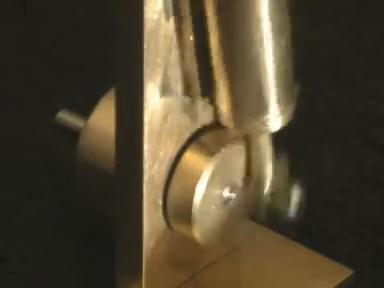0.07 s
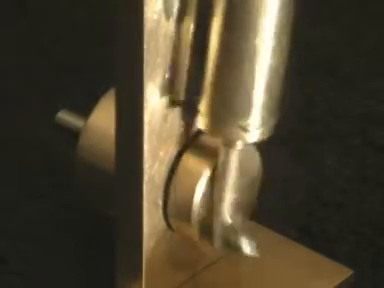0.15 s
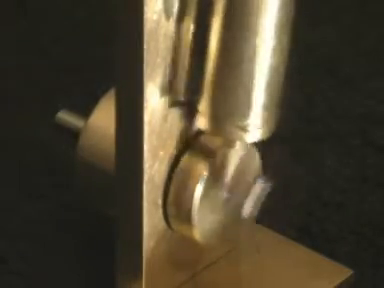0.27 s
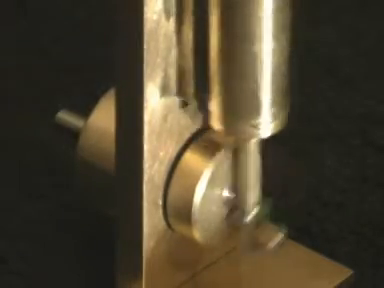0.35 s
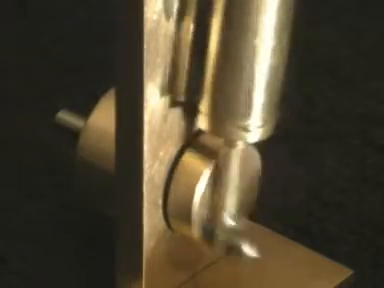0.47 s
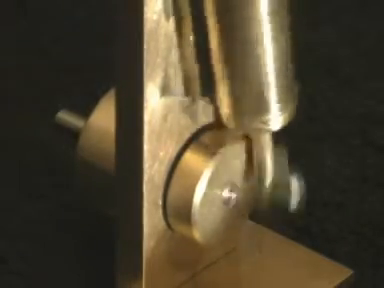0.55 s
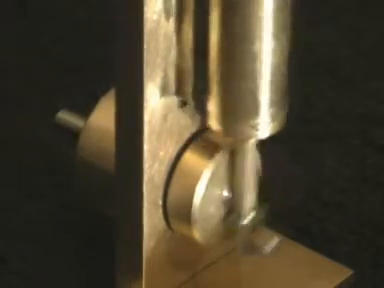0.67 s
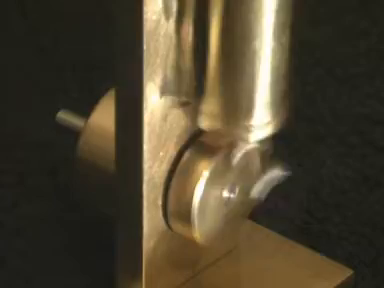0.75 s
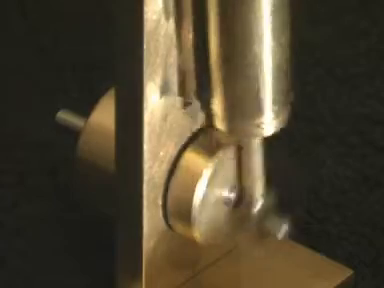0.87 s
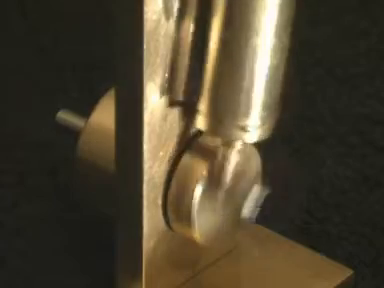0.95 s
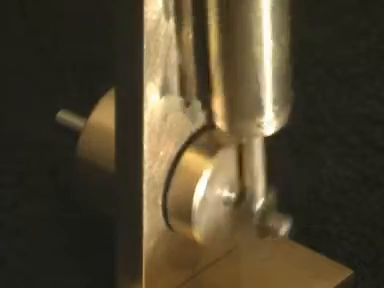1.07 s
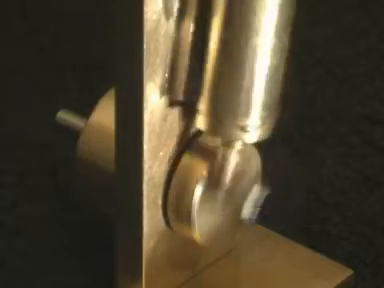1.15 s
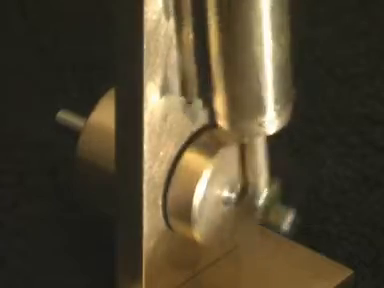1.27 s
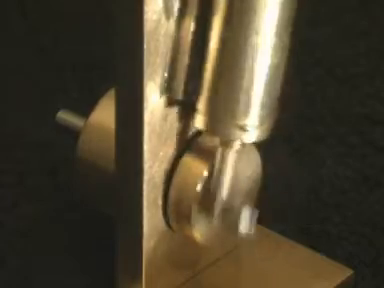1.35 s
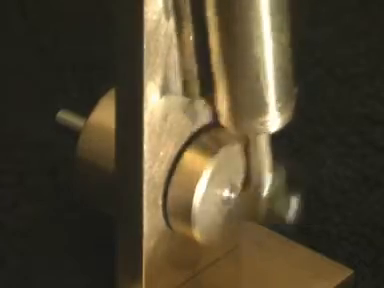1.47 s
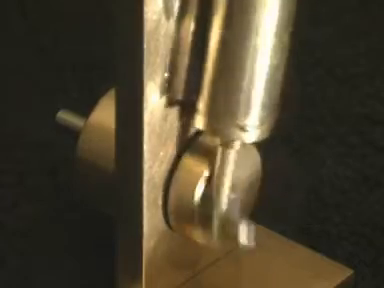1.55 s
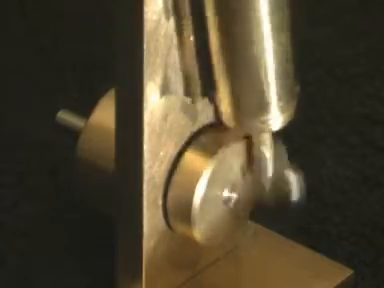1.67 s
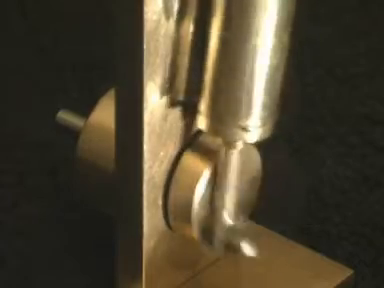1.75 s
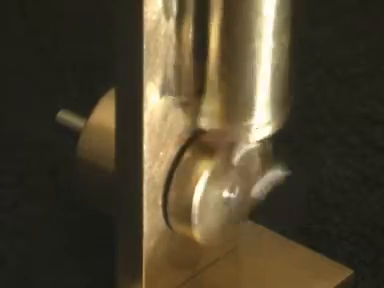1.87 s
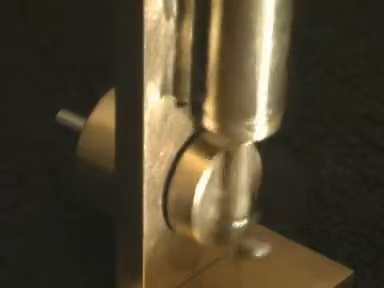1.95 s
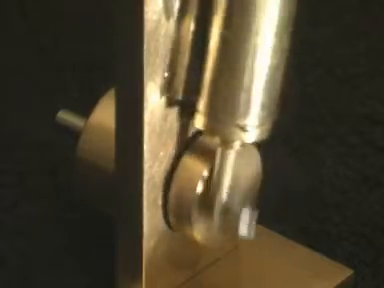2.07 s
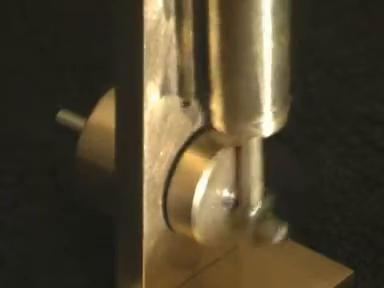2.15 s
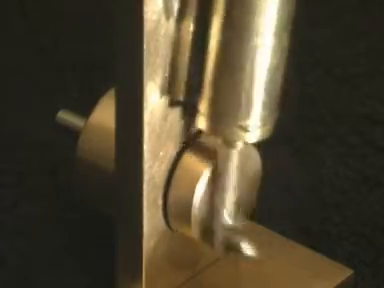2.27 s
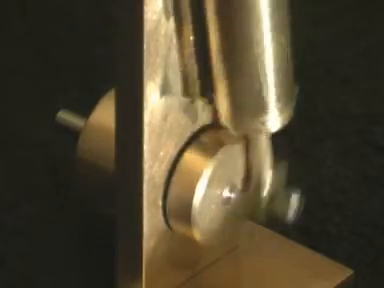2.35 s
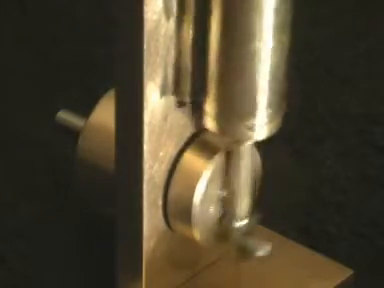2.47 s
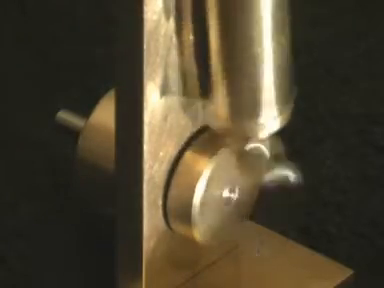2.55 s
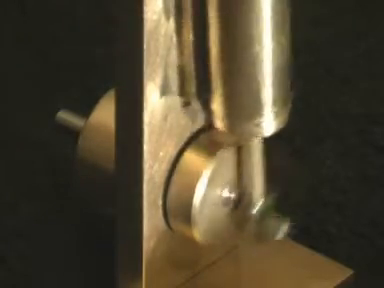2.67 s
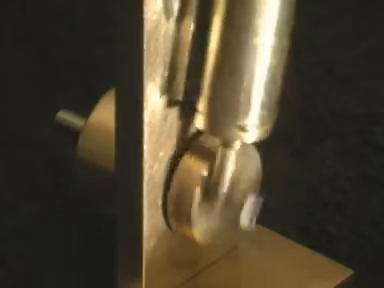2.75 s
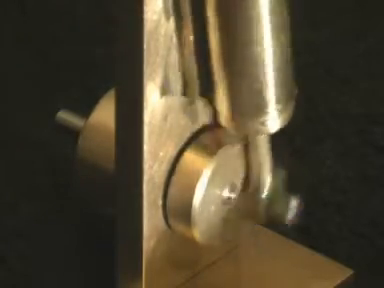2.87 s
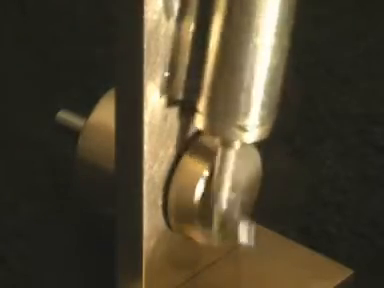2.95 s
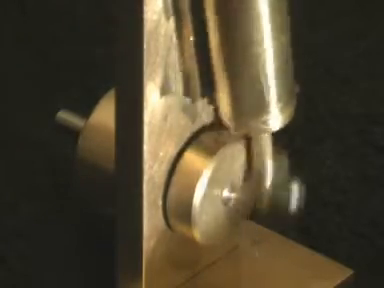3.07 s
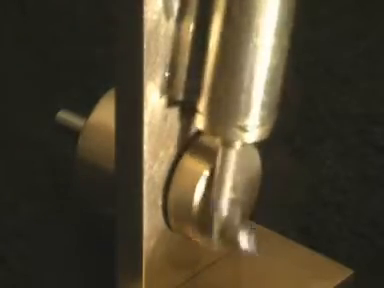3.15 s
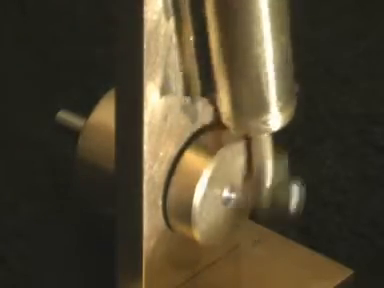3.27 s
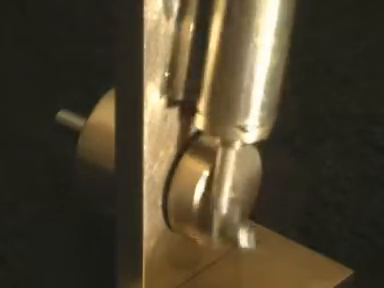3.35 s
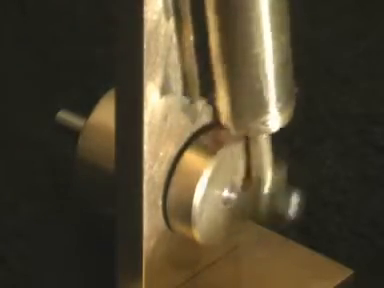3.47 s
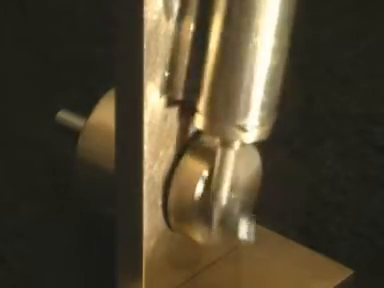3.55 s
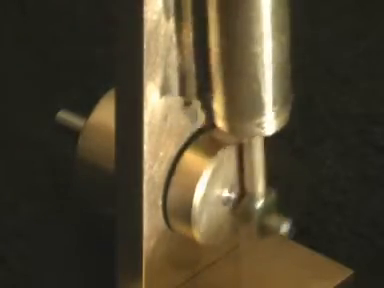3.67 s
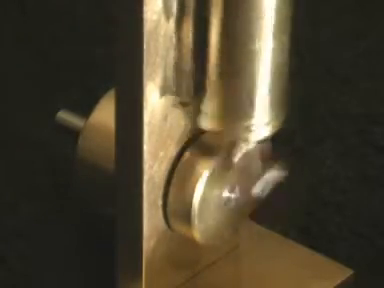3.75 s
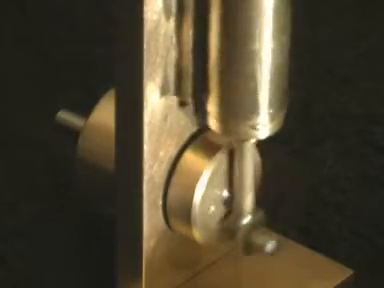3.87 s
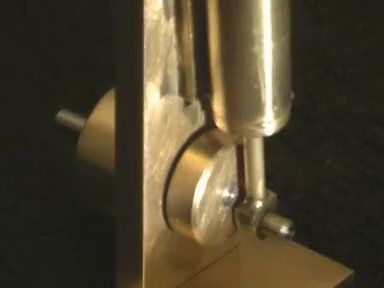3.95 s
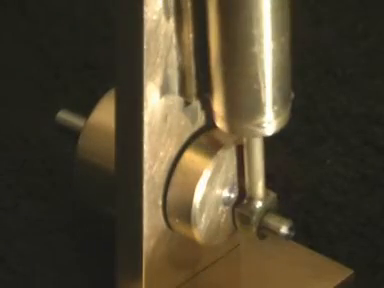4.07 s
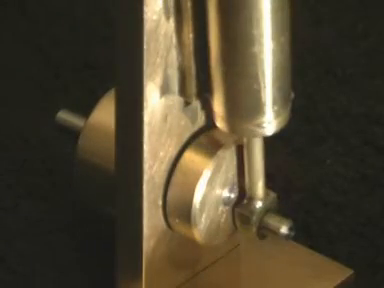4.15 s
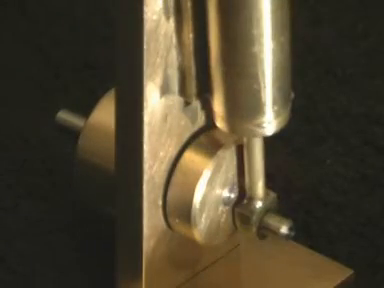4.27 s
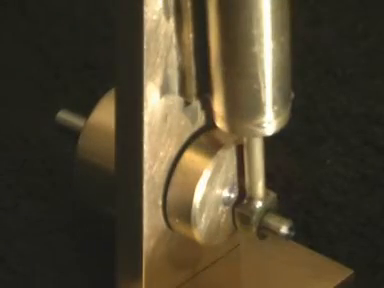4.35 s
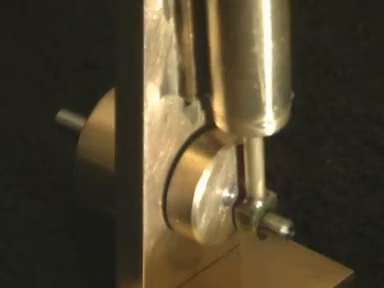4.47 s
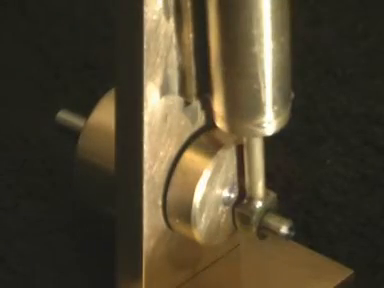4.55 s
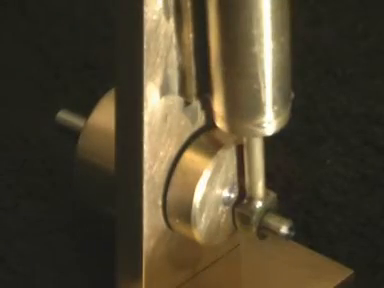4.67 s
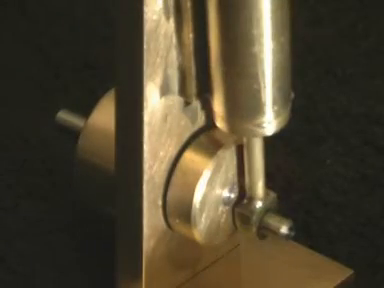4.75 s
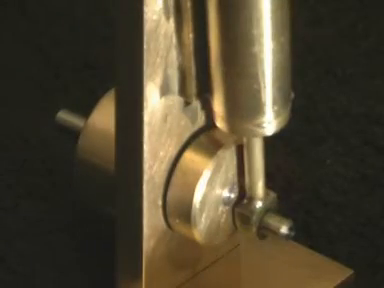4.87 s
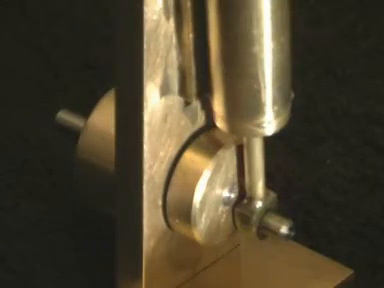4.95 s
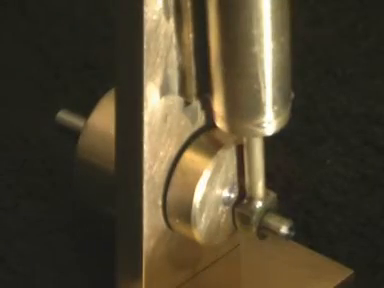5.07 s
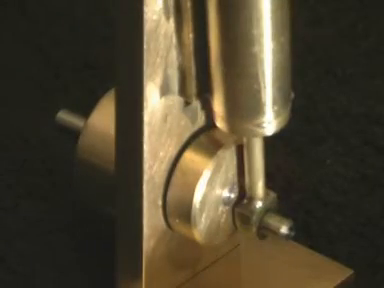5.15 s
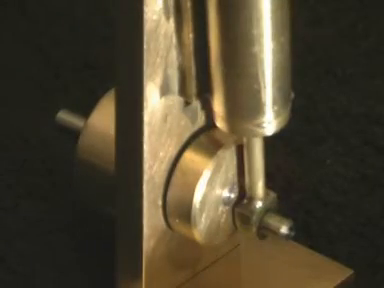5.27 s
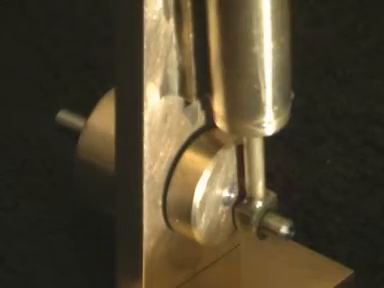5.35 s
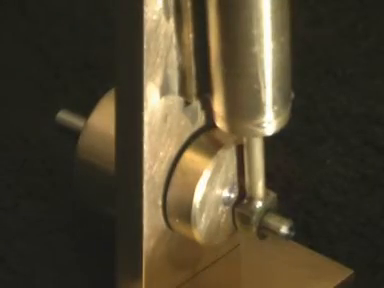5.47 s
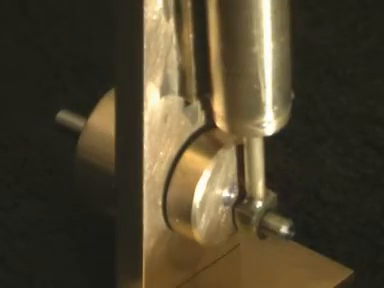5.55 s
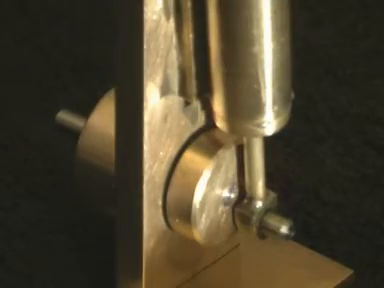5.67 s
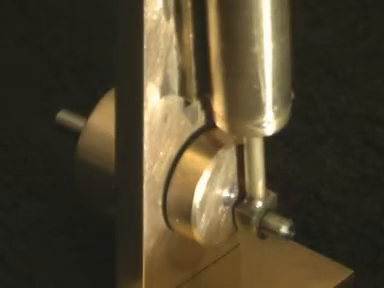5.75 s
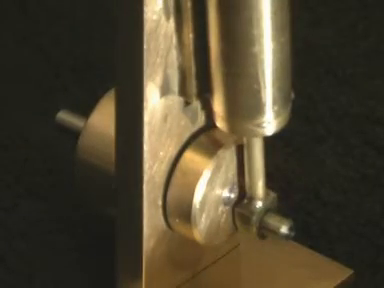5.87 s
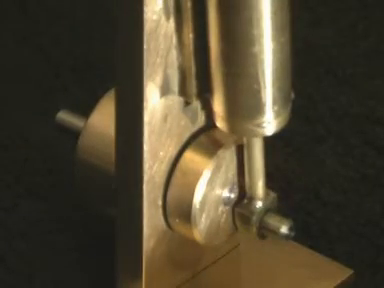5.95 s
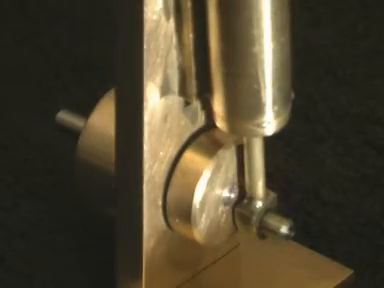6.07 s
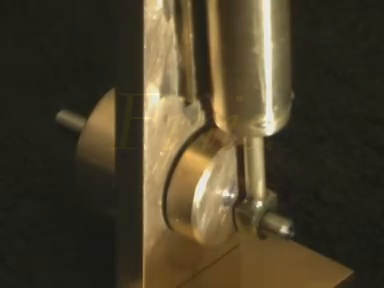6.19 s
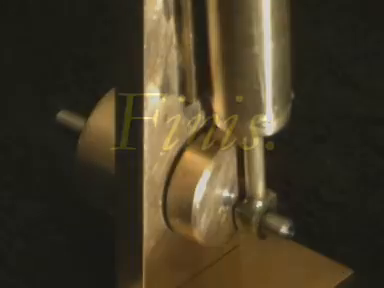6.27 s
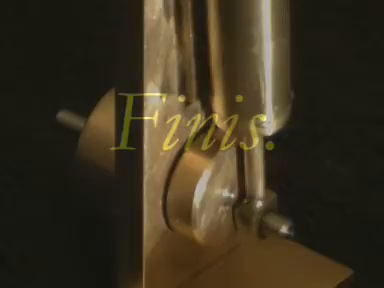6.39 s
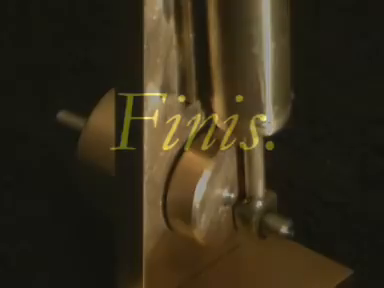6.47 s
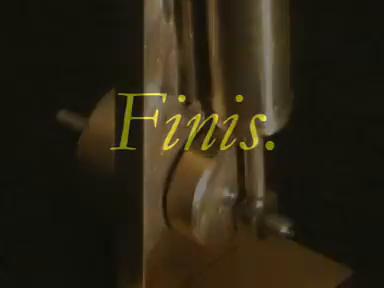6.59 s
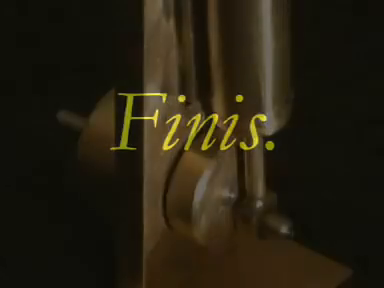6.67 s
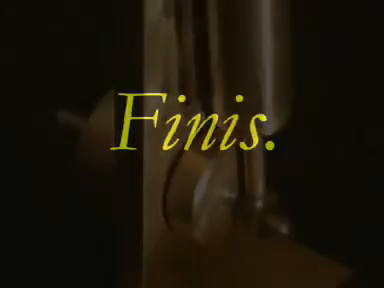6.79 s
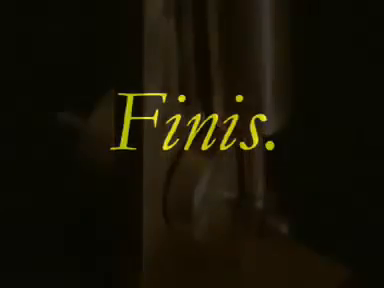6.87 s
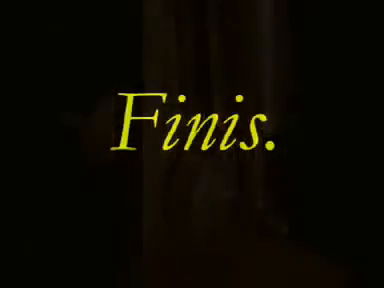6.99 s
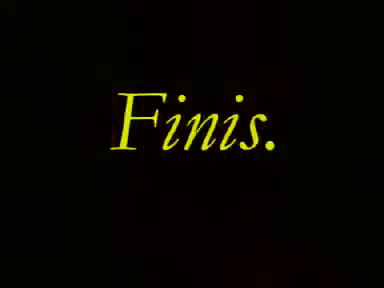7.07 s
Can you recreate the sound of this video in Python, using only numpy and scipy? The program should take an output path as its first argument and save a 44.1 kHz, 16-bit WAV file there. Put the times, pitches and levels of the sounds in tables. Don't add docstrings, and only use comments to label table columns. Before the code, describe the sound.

A small compressed-air engine spits rapid crisp exhaust puffs, slows gradually and stalls near four seconds, leaving a steady airy leak that fades out.

```python
import sys
import numpy as np
from scipy import signal
from scipy.fft import rfft, irfft
from scipy.io import wavfile
from scipy.ndimage import uniform_filter1d

SR = 44100
rng = np.random.default_rng(int(sys.argv[2]) if len(sys.argv) > 2 else 0)


def volts_from_db(level):
    exponent = np.asarray(level, float) / 20
    return 10 ** exponent


def file_out(sig):
    cols = np.atleast_2d(sig).T
    lim = np.clip(cols, -1, 1)
    pcm = np.round(lim * 32767).astype(np.int16)
    wavfile.write(sys.argv[1], SR, pcm)


N = 313992
T = np.arange(N) / SR
F = np.fft.rfftfreq(N, 1 / SR)

TURN_S = [0.003, 0.16, .315, 0.472, .633, 0.807, .993, 1.192, 1.38, 1.569, 1.75, 1.926, 2.099, 2.271, 2.445,
          2.618, 2.785, 2.969, 3.16, 3.362, 3.568, 3.807]
FIRST_TURN_S, LAST_TURN_S = 0.18, 0.24
STALL_ANGLE = 0.6927
LEAD_S = 0.017
PUFF_ANGLE = 0.35
# time_s, level_db
PRESSURE = [(0, 1.14), (2.5, 0.6), (3.9, -1.5)]
SPIT_FOLLOWS, CYLINDER_FOLLOWS = 0.87, 0.49
SPIT_SCATTER_DB, PUFF_SCATTER_DB, THUMP_SCATTER_DB, THUMP_DB = 1.35, 0.4, 1, 1

PORT_CRACKS, SPIT = (0.9065, 0.01, 840, 76), (0.995, 0.0083, 490, 157)
EXHAUST, BLOWDOWN = (0.22, 0.12, 117, 54), (0.27, 0.13, 360, 88)
PORT_SHUTS = (0.43, 0.1, 83, 330)
FILLING, RETURN = (0.061, 0.73, 200, 44), (0.736, 0.026, 85, 89)
CORE = (.35, 0.046, 113, 100)
# (jet_db, gap_db, cylinder_db, leak_db, edge_db)
FLOW = [
    (PORT_CRACKS, (-31.5, -61, -61, -49, -56)),
    (SPIT, (-26, -33.5, -43, -31, -50)),
    (EXHAUST, (-27.5, -37.5, -55, -37.5, -40)),
    (BLOWDOWN, (-34.5, -42, -37.5, -35.5, -50)),
    (CORE, (-37, -42, -35.5, -39, -56)),
    (PORT_SHUTS, (-31, -45.5, -49, -52, -37)),
    (FILLING, (-63, -46.5, -70, -42, -62)),
    (RETURN, (-62, -65, -53, -36.5, -60)),
]
# jet_db, gap_db, cylinder_db, leak_db, edge_db
SHUT = (-50, -70, -66, -49.5, -66)

# pitch_hz, level_db
JET = [(4500, -42), (5800, -14.5), (6800, -6.5), (7600, -3.5), (9000, -0.5), (10400, -2.5), (11600, -4),
       (13000, -13), (14500, -20.5), (16200, -23)]
# pitch_hz, level_db
GAP = [(600, -3.5), (1500, -15.5), (2400, -10.5), (3200, 0), (4400, 3), (5500, -2), (8000, -3),
       (11000, -6.5), (12600, -4.5), (13400, -2.5), (15000, 0), (16500, -22)]
# pitch_hz, level_db
LEAK = [(410, -53), (700, -8.5), (885, -10), (1340, -6.5), (1470, -14), (1640, -11.5), (2370, -12.5),
        (2850, -8), (3070, -9.5), (4840, -8), (5550, -13.5), (6920, -2), (8640, 0), (10700, -6),
        (13300, -9)]
# pitch_hz, width_hz, level_db
CYLINDER = [(830, 200, -7.5), (1078, 290, 2.5), (1386, 320, -0.5), (1628, 200, 1), (2066, 435, 1.5),
            (2500, 350, -8), (2900, 400, -9)]
# pitch_hz, width_hz, level_db
SEAT = [(1280, 540, 2.9), (1630, 120, 4.9), (2780, 160, 4.5), (3150, 90, 5.5), (7040, 220, 3),
        (8800, 500, 2.5), (13400, 500, -3)]
EDGE_HZ, EDGE_WIDTH_HZ = 12400, 2300
WHINE_HZ, WHINE_DB = 14300, -14
# crank_angle_turns, level_db
THUMPS = [
    (0, -44),
    (.53, -49.5),
    (.3, -53.5),
]
# pitch_hz, level_db, decay_s (to -60 dB)
BASE = [(88, -12, 0.037), (119, 5.5, 0.091)]

# pitch_hz, level_db
MOTOR = [(50, -43), (85, -12.5), (150, -7.5), (204, -6.5), (318, -6), (403, -2), (491, -2.5), (585, -8),
         (655, -10.5), (875, -13.5), (1000, -17), (1300, -38), (2200, -120)]
MOTOR_DB = -54
# pitch_hz, level_db, wobble_db
HUM = [(49.7, -67, 2), (120, -65.5, 2.5), (149.8, -59.5, 0.4), (162, -62.5, 2), (215.2, -68.5, 2),
       (393, -64.5, 0), (423.6, -63.5, -0.3), (492, -65.5, 0), (652, -65, 3.5)]

# start_s, level_db
TAPS = [
    (.119, -39),
    (.131, -40),
    (5.25, -48),
]
# pitch_hz, level_db, decay_s (to -60 dB)
TRAY = [(325, -3, .06), (384, 6, .06), (447, -2.5, .05)]
# start_s, level_db, dullness_0_to_1
KNOCKS = [
    (4.4181, -30.5, 0.44),
    (4.435, -39, 0.76),
    (4.46, -39, 0.7),
]
# pitch_hz, level_db, decay_s (to -60 dB)
BENCH = [(120, -15, 0.1), (220, -5.5, 0.16), (250, -9, 0.11), (283, -5.5, 0.12), (340, -9, 0.1),
         (385, -7, 0.058), (457, -6, 0.055)]

# time_s, level_db
FADE = [(6.0, -2.5), (6.2, -3), (6.4, -7), (6.6, -11.5), (6.8, -17), (7.0, -26.5), (7.12, -36)]
# low_hz, high_hz, treble_level_db
TOP_BANDS = [(14500, 15150, -56.5), (15150, 15730, -33.5)]
# pitch_hz, level_db
BUZZ = [(1378.125, -76), (2756.25, -82), (4134.375, -85), (5512.5, -88), (6890.625, -85)]
OFFSET = -0.0005


def unit(x):
    return x / np.sqrt(np.mean(x ** 2))


def shape(points):
    hz, db = np.transpose(points)
    octave = np.log2(F + 1)
    outside = np.maximum(np.log2(hz[0]) - octave, 0) + np.maximum(octave - np.log2(hz[-1]), 0)
    return volts_from_db(np.interp(octave, np.log2(hz), db) - 11 * outside)


def resonance(hz, width_hz):
    return 1 / np.sqrt(1 + ((F ** 2 - hz ** 2) / (F * width_hz + 1e-9)) ** 2)


def hiss(gain):
    return unit(irfft(rfft(rng.standard_normal(N)) * gain, N))


def flutter(rate_hz):
    return hiss(1 / (1 + (F / rate_hz) ** 2))


def below(x, hz):
    return signal.sosfiltfilt(signal.ellip(12, 0.1, 45, hz, fs=SR, output="sos"), x)


def ring(times, gains, modes, push_s):
    blows = np.zeros(N)
    np.add.at(blows, np.clip((np.asarray(times) * SR).astype(int), 0, N - 1), gains)
    t = T[:SR // 3]
    body = 0
    for hz, db, t60 in modes:
        body = body + volts_from_db(db) * np.sin(2 * np.pi * hz * t) * np.exp(-np.log(1000) * t / t60)
    push = t * np.exp(-t / push_s)
    sound = signal.fftconvolve(blows, body)[:N]
    sound = signal.fftconvolve(sound, push / push.sum())[:N]
    return signal.sosfilt(signal.butter(4, 90, "high", fs=SR, output="sos"), sound)


def shaft():
    top_s = np.array(TURN_S)
    count = np.arange(len(top_s))
    stall_s = top_s[-1] + STALL_ANGLE * LAST_TURN_S
    marks_s = np.r_[top_s[0] - FIRST_TURN_S, np.c_[top_s - LEAD_S, top_s].ravel(), stall_s]
    crack_and_top = count[:, None] + [PORT_CRACKS[0] - 1, 0]
    turns = np.r_[-1, crack_and_top.ravel(), count[-1] + STALL_ANGLE]
    return marks_s, turns


def ports(crank):
    power = volts_from_db(np.array(SHUT))[:, None] ** 2
    for (opens, hold, rise_db, fall_db), flow_db in FLOW:
        since = (crank - opens - hold / 2 + 0.5) % 1 - 0.5
        opening_db = rise_db * np.maximum(-since - hold / 2, 0)
        closing_db = fall_db * np.maximum(since - hold / 2, 0)
        power = power + volts_from_db(2 * (np.array(flow_db)[:, None] - opening_db - closing_db))
    return np.sqrt(power)


def efforts(crank):
    count = np.arange(len(TURN_S))
    pressure_db = np.interp(TURN_S, *np.transpose(PRESSURE))
    chance = rng.standard_normal((3, len(count)))
    spit_db = SPIT_FOLLOWS * pressure_db + SPIT_SCATTER_DB * chance[0]
    puff_db = pressure_db + PUFF_SCATTER_DB * chance[1]
    cylinder_db = CYLINDER_FOLLOWS * pressure_db + PUFF_SCATTER_DB * chance[2]
    spit_then_puff = np.c_[count, count + PUFF_ANGLE].ravel()
    effort_db = np.interp(crank, spit_then_puff, np.c_[spit_db, puff_db].ravel())
    return effort_db, np.interp(crank, count + PUFF_ANGLE, cylinder_db)


def port_air(jet_port, gap_port, edge_port, effort_db, eddies):
    jet = jet_port * volts_from_db(effort_db + 0.32 * flutter(40)) * eddies * hiss(shape(JET))
    gap = gap_port * volts_from_db(effort_db + 0.39 * flutter(40)) * eddies * hiss(shape(GAP))
    rim = hiss(1 / (1 + ((F - EDGE_HZ) / EDGE_WIDTH_HZ) ** 4))
    edge = edge_port * volts_from_db(0.5 * effort_db) * eddies * rim
    return jet + gap + edge


def cylinder_puff(port, effort_db, cylinder_db, eddies):
    hollow = np.sqrt(sum((volts_from_db(db) * resonance(hz, width) ** 2) ** 2 for hz, width, db in CYLINDER))
    cavity = port * volts_from_db(cylinder_db + flutter(60)) * eddies * hiss(hollow)
    dull = irfft(rfft(cavity) * resonance(1060, 1200), N)
    return dull + np.clip(0.3 + 0.3 * effort_db, 0, 1) * (cavity - dull)


def leak_hiss(port, effort_db):
    seat = np.prod([1 + (volts_from_db(db) - 1) * resonance(hz, width) ** 2 for hz, width, db in SEAT], axis=0)
    whine = hiss(1 / (1 + ((F - WHINE_HZ) / 850) ** 6))
    seep = hiss(shape(LEAK) * seat) + volts_from_db(WHINE_DB) * whine
    return port * volts_from_db(0.87 * effort_db + 0.26 * flutter(18)) * seep


def base_thumps(marks_s, turns):
    count = np.arange(len(TURN_S))
    thump_db = THUMP_DB + THUMP_SCATTER_DB * rng.standard_normal(len(count))
    sound = np.zeros(N)
    for angle, db in THUMPS:
        reached = len(count) - (angle > STALL_ANGLE)
        times = np.interp(count + angle, turns, marks_s)
        sound += ring(times[:reached], volts_from_db(db + thump_db)[:reached], BASE, 0.0015)
    return sound


def shaft_rumble(stall_s):
    colour = shape([(75, -6), (110, -6), (250, 1), (350, -7.5), (550, -9.5), (800, -17)])
    return volts_from_db(-58.5 + 2 * flutter(25)) * (T < stall_s) * hiss(colour)


def engine():
    marks_s, turns = shaft()
    stall_s = marks_s[-1]
    crank = np.interp(T, marks_s, turns)
    jet_port, gap_port, cylinder_port, leak_port, edge_port = ports(crank)
    effort_db, cylinder_db = efforts(crank)
    eddies = volts_from_db(1.4 * flutter(300))
    air = port_air(jet_port, gap_port, edge_port, effort_db, eddies)
    air = air + cylinder_puff(cylinder_port, effort_db, cylinder_db, eddies)
    moving = np.clip((stall_s - T) / 0.021, 0.12, 1)
    leak = leak_hiss(leak_port, effort_db)
    return moving * air + leak + base_thumps(marks_s, turns) + shaft_rumble(stall_s)


def camcorder():
    out = volts_from_db(MOTOR_DB + flutter(12)) * np.array([hiss(shape(MOTOR)), hiss(shape(MOTOR))])
    for hz, db, wobble_db in HUM:
        phase = 2 * np.pi * hz * T + 0.29 * wobble_db * flutter(0.65)
        lag = np.array([[0], [rng.uniform(0, min(hz / 180, 1.5))]])
        out = out + np.sqrt(2) * volts_from_db(db + wobble_db * flutter(4.9)) * np.sin(phase + lag)
    return out


def taps():
    start_s, db = np.transpose(TAPS)
    return ring(start_s, volts_from_db(db), TRAY, 0.00023)


def knocks():
    sound = np.zeros(N)
    for start_s, db, dull in KNOCKS:
        sound += ring([start_s], [volts_from_db(db)], BENCH, 0.0001 + 0.00044 * dull)
    return sound


def room(near):
    t = T[:SR // 5]
    tails = rng.standard_normal((2, len(t))) * np.exp(-np.log(1000) * t / 0.071) * (t > 0.001)
    tails = tails / np.sqrt(np.sum(tails ** 2, axis=1, keepdims=True))
    echoes = signal.fftconvolve(near[None], tails, axes=1)[:, :N]
    walls = shape([(60, -14), (500, -6), (1000, -4.5), (2500, -6.5), (8000, -23), (11000, -6.5), (16000, -11)])
    return irfft(rfft(echoes) * walls, N)


def scene():
    near = engine() + taps() + knocks()
    return near + room(near) + camcorder()


def capsules(dry):
    rise = 1j * F / 3000
    lift = (rise + volts_from_db(4)) / (rise + 1)
    thin = (rise + volts_from_db(-11)) / (rise + 1) * volts_from_db(1)
    thin = thin * (1 - 0.34 * resonance(11260, 1800) ** 2)
    return irfft(rfft(dry) * np.array([lift, lift * thin]), N)


def gated_top(x):
    treble = uniform_filter1d(np.diff(x[0], prepend=0) ** 2, size=1500)
    out = below(x, TOP_BANDS[0][0])
    for low_hz, high_hz, db in TOP_BANDS:
        gate = 1.0 * (treble > volts_from_db(db) ** 2)
        gate = uniform_filter1d(uniform_filter1d(gate, size=400), size=400)
        out = out + gate * (below(x, high_hz) - below(x, low_hz))
    return out


def steady_tones():
    return sum(np.sqrt(2) * volts_from_db(db) * np.sin(2 * np.pi * hz * T) for hz, db in BUZZ) + OFFSET


def roll_off(x):
    return signal.sosfilt(signal.butter(12, 16220, fs=SR, output="sos"), x)


def record(dry):
    faded = capsules(dry) * volts_from_db(np.interp(T, *np.transpose(FADE)))
    mix = gated_top(faded) + steady_tones()
    return roll_off(mix)


dry = scene()
out = record(dry)
file_out(out)
```